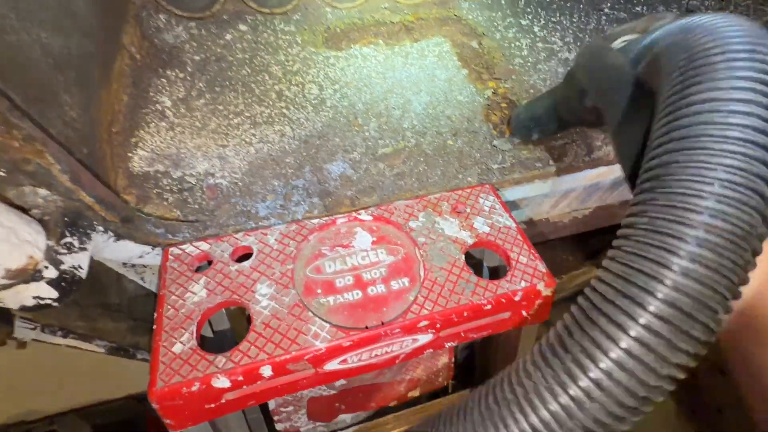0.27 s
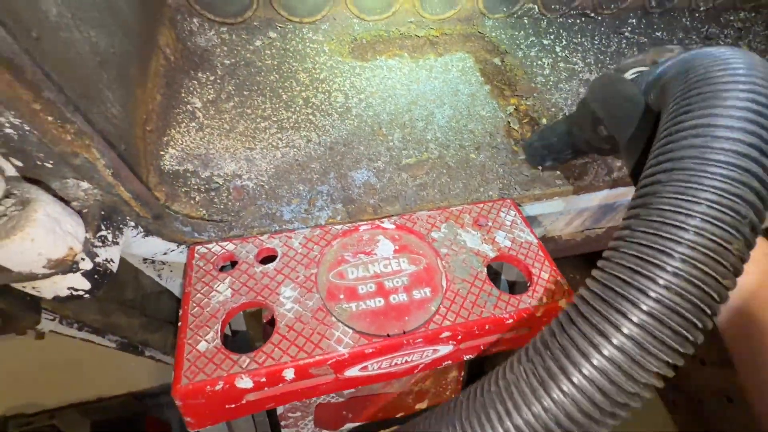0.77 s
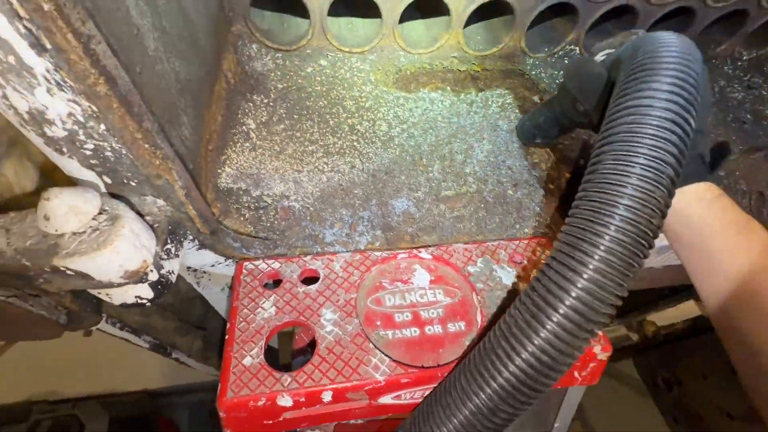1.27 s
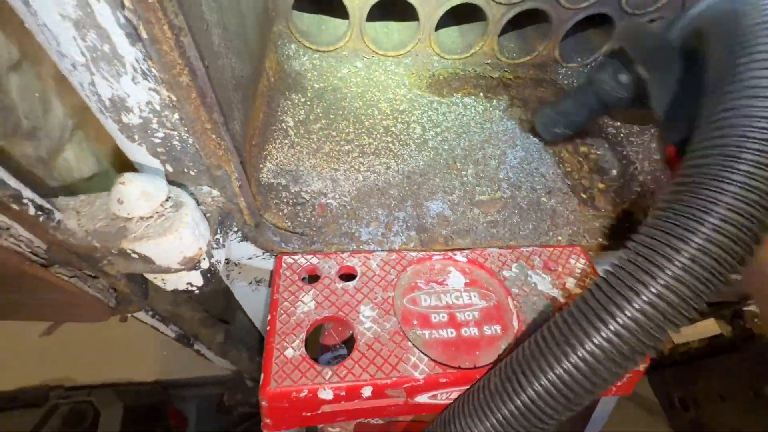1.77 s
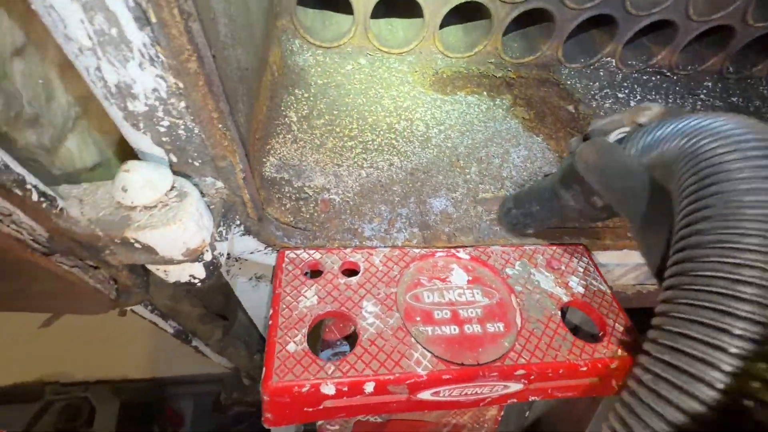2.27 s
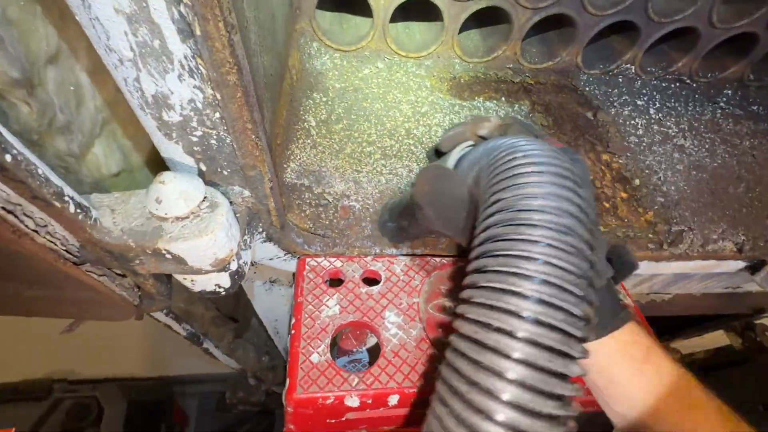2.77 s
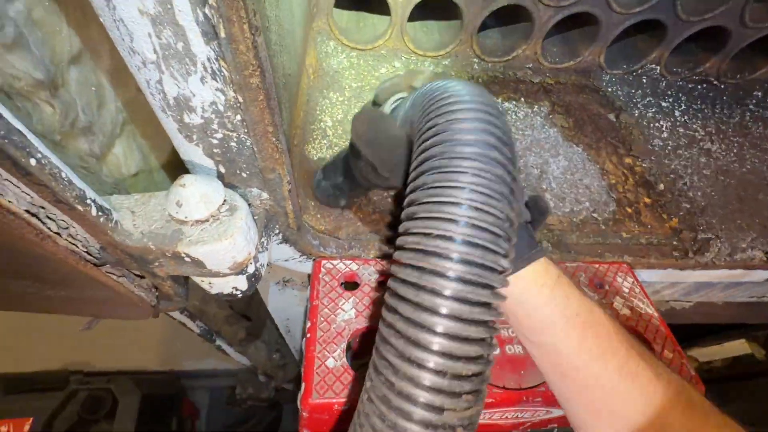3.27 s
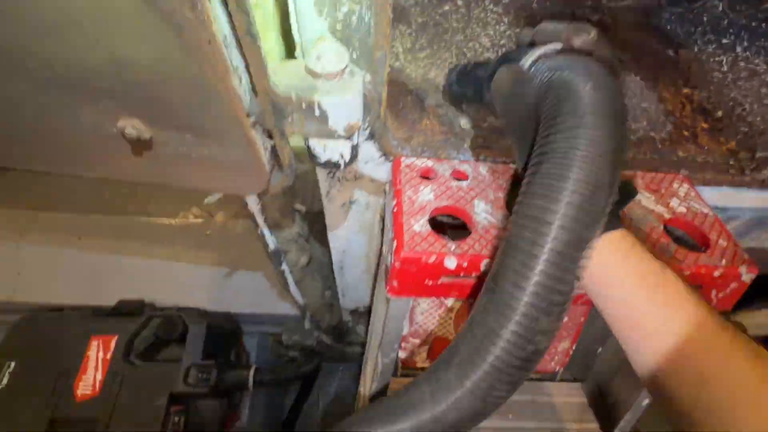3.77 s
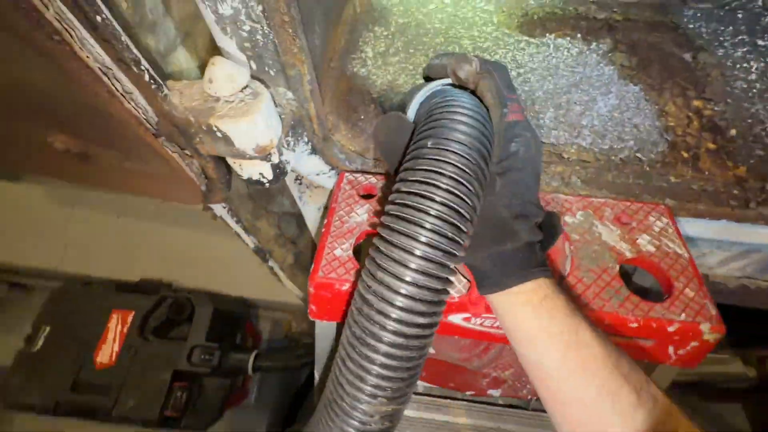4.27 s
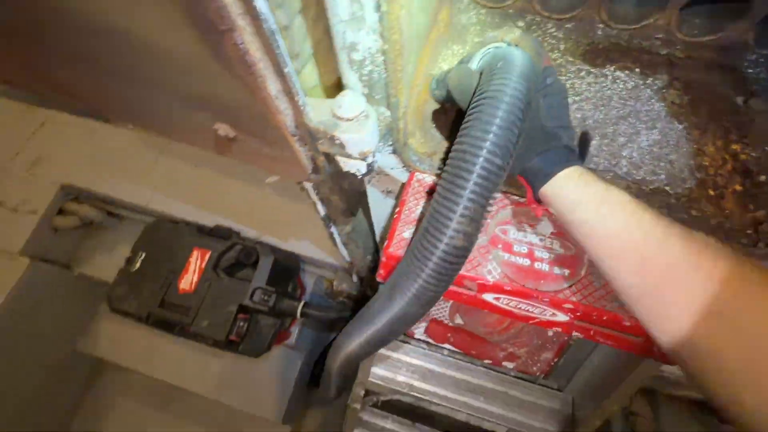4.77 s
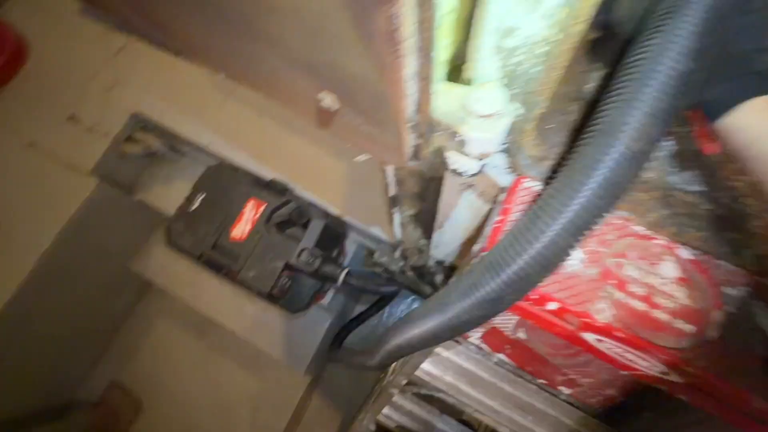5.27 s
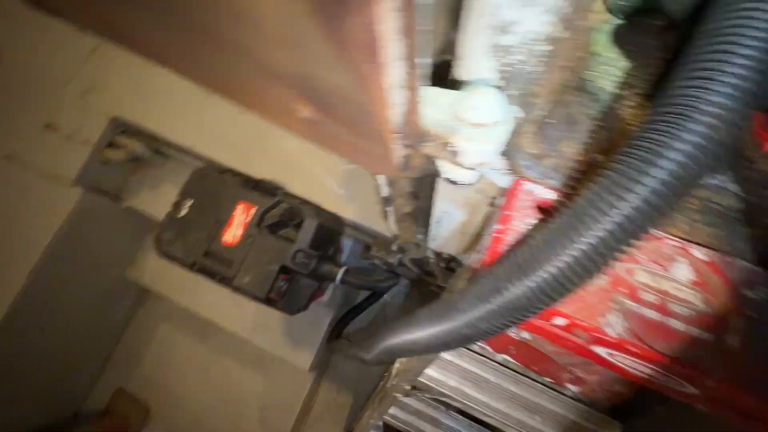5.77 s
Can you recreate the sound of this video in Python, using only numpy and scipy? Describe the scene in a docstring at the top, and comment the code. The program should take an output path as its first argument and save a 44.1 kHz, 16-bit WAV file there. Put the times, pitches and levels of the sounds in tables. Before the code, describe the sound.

A vacuum runs throughout without stopping, its tonal whine shifting gently between left and right. Air rushes through a ribbed hose, crackling with fine debris that leans left. Lumps rap the hose early on and again past halfway; breathy high whistling swells as the nozzle gap narrows. The microphone is close and moving, in a hard metal boiler space.

```python
"""Shop vacuum in a boiler room

The motor whines as a sine with faint overtones. Air is patchy noise: hose resonances boom, the rush has its
own spectrum, and nozzle resonances whistle and nearly sing. Grit is ticking noise with sprays and a gliding
squeak; lumps knock the hose wall with decaying sines, resonant blows and thuds of noise.
Two microphones a hand apart move about, so the whine shifts between them."""
import sys
import numpy as np
from scipy import signal
from scipy.fft import rfft, irfft, next_fast_len
from scipy.io import wavfile
from scipy.ndimage import uniform_filter1d, map_coordinates

SR = 44100
rng = np.random.default_rng(int(sys.argv[2]) if len(sys.argv) > 2 else 0)


def file_out(sig):
    """Save sig as 16-bit WAV at sys.argv[1]."""
    # one column per channel
    cols = np.atleast_2d(sig).T
    # limit, then scale
    lim = np.clip(cols, -1, 1)
    pcm = np.round(lim * 32767).astype(np.int16)
    wavfile.write(sys.argv[1], SR, pcm)


def magnitude_from_level(level_db):
    """Linear magnitude for a level in decibels (20 dB per decade)."""
    exponent = np.asarray(level_db, float) / 20
    return 10 ** exponent


N = 265923
TIME = np.arange(N) / SR  # seconds

# Motor whine, which speeds up when the nozzle is choked.
# Each row: time in seconds, pitch in Hz, left level in dB, right level in dB.
WHINE_PATH = [(0.03, 821.5, -38, -41), (0.55, 821.8, -40, -42.5), (1.1, 821, -39, -42.2),
              (1.63, 821.5, -40, -43), (2.07, 818, -41.5, -41.5), (2.25, 822.2, -41.5, -43),
              (2.83, 823.8, -43.5, -43.0), (3.07, 828, -47.5, -43), (3.43, 823.7, -44.5, -44.5),
              (3.58, 826.5, -44.5, -45), (3.83, 820, -42.5, -44), (4.03, 814.4, -43.5, -43.1),
              (4.43, 813.1, -40, -41.5), (4.63, 814.6, -40, -39), (4.97, 814, -42.5, -37.5),
              (5.23, 816.3, -41, -39), (5.43, 818, -47, -40.3), (5.6, 818.4, -46.5, -40.5),
              (6.01, 812.8, -39.5, -41)]
# The level dips briefly at the lowest partial alone.
# Holds: centre in seconds, half width in seconds, level change in dB.
LEVEL_DIP = (3.085, 0.014, -4.5)
# Overtones of the whine at rest, before flutter. Each row: multiple of the pitch, left dB, right dB.
OVERTONES_AT_REST = [(2, -69, -65.5), (3, -66, -70), (4, -74, -70.5), (5, -77, -83), (8, -79, -84),
                     (9, -77, -78), (10, -82, -85)]
# Overtones that swell at the left microphone.
# Each row: multiple of the pitch, centre in seconds, half width in seconds, added amplitude in dB.
LEFT_OVERTONE_SWELLS = [(2, 1.167, 0.16, -63.5), (2, 1.88, 0.303, -65), (2, 2.5, .3, -71),
                        (2, 3.9, 0.51, -66), (2, 5.52, 0.75, -64.5), (3, 2.87, 0.19, -65),
                        (3, 3.79, 0.147, -64), (3, 5.66, 0.31, -69), (5, 0.62, 1.1, -67),
                        (4, 4.03, 0.16, -71), (9, .55, .9, -61.5), (9, 2.7, .33, -70), (9, 4.4, .6, -67.5),
                        (9, 5.65, .25, -67.5), (10, 1.65, 0.17, -71), (10, 3.6, 0.27, -75),
                        (10, 5.8, 0.43, -76)]
# The same at the right microphone.
# Each row: multiple of the pitch, centre in seconds, half width in seconds, added amplitude in dB.
RIGHT_OVERTONE_SWELLS = [(2, 2.01, .15, -63.5), (2, 2.94, 0.62, -68.5)]
# Overtones cancelled or turned over in phase at the right microphone.
# Each row: multiple of the pitch, centre in seconds, half width in seconds, subtracted amplitude in dB.
RIGHT_TURNOVERS = [(2, 4.4, 0.3, -62.5), (2, 5.56, 0.24, -58), (3, 5.61, 0.36, -62)]
FREE_HZ = 814
LEAD_RAD, LEAD_RAD_PER_HZ = 0.29, 0.11  # left leads more as the pitch climbs over FREE_HZ

# Standing waves of the hose air. Each row: centre in Hz, width in Hz, relative level in dB.
HOSE_MODES = [(116.6, 23.6, -2.5), (179.5, 12.4, 1), (237, 12.4, 2.5), (290.4, 10.6, -1), (328, 16, 4.5),
              (393.8, 11.7, 1), (449, 11, 2.5), (518, 41, -6), (653, 34, -1), (1102, 196, -6)]
# Resonances of the nozzle gap, applied twice. Each row: centre in Hz, width in Hz, level per pass in dB.
NOZZLE_MODES = [(3080, 106, 4.5), (3253, 180, 7.5), (3540, 850, 4)]
# Colour of the rush of air. Each row: frequency in Hz, relative density in dB per Hz.
RUSH_SPECTRUM = [(80, -24), (200, 0.5), (800, 2), (1050, -1.5), (1450, -0.5), (2200, 2.5), (2800, -0.5),
                 (4000, -2), (5800, -5), (7400, -5), (9000, -18.5), (16000, -34.5)]
# Colour of the grit stream. Each row: frequency in Hz, relative density in dB per Hz.
HISS_SPECTRUM = [(1000, -22), (3000, -6.5), (6000, -11.5), (10000, -4.5), (13000, -12), (14500, -9.5),
                 (16000, -14.5)]

# Left-right likeness once the arrival lag is taken out. Each row: frequency in Hz, likeness from 0 to 1.
LIKENESS = [(60, 1), (450, 0.85), (1120, 0), (1430, 0.68), (2000, 0), (3400, 0.28), (15000, 0.06)]
# Long waves fill the room and do not keep that lag. Each row: frequency in Hz, left lead in radians.
LONG_WAVE_LEAD = [(400, 0), (1000, .4), (1250, 3), (1900, 3)]
LAG_S = 0.00024  # sound from the nozzle reaches the left microphone first

# How much grit streams up the hose, and where the nozzle is.
# Each row: time in seconds, hiss level in dB, left over right in dB.
GRIT_STREAM = [(0.03, -53.5, 1.5), (.4, -54.5, 3), (.85, -51, 0.5), (1.3, -54, 3.5), (1.75, -60, 2.5),
               (1.97, -65, 9), (2.03, -54.5, 2.5), (2.5, -54.5, 3), (3.3, -58.5, 6.5), (3.6, -63.5, 7.5),
               (4.25, -65, 9.5), (4.4, -59.5, 5), (4.75, -60.5, 4), (5.4, -58.5, 2), (6.0, -58, 2)]
FULL_STREAM_DB = -57
LONG_WAVES_DB, SHORT_WAVES_DB, RUSH_DB = -69.5, -64.5, -56.5  # base levels at FULL_STREAM_DB
HOSE_FOLLOWS, RUSH_FOLLOWS = 0.17, 0.072  # dB for each dB of stream
HOSE_RECEDES_DB_PER_S = 1.2  # the hose is carried away from the microphones
# The hose drags and rumbles.
# Each row: start in seconds, length in seconds, added long waves in dB, added short waves in dB.
HOSE_DRAGS = [(0.24, 0.277, -80, -67.5), (0.773, 0.15, -73.5, -68), (0.98, 0.29, -65, -67),
              (1.971, 0.15, -66, -75), (2.416, 0.076, -63, -92), (3.4, 0.077, -66, -81),
              (3.836, 0.2, -98, -66), (4.149, 0.127, -72, -60), (4.326, 0.186, -78, -75)]
# The nozzle scrapes the floor and the rush swells.
# Each row: start in seconds, length in seconds, added amplitude in dB.
FLOOR_SCRAPES = [(0.728, 0.2, -64.5), (3.396, 0.089, -63), (4.338, 0.409, -63)]
# The nozzle gap narrows and whistles.
# Each row: start in seconds, length in seconds, added dB at the start, added dB at the end.
GAP_WHISTLES = [(0.537, 0.16, -57, -69), (1.17, 0.58, -66, -62.5), (2.123, 0.6, -59, -57),
                (2.742, 0.86, -54, -60.5), (4.956, 0.397, -62, -66.5), (5.367, 0.9, -63, -71)]
OPEN_WHISTLE_DB, EDGE_S = -77, 0.022  # whistle of the open gap; rise and fall of every spell

PUFFS_PER_S, PUFF_FADE_S, PUFF_DB = 14, 0.014, 1  # grit comes in puffs that start sharply
# A crumb squeaks through the gap.
# Holds: centre in seconds, half length in seconds, peak in dB, pitch at the centre in Hz, rise in Hz per second.
CRUMB_SQUEAK = (0.1, .012, -52, 2100, 5001.5)
# Sprays of grit at the nozzle.
# Each row: start in seconds, level in dB before the envelope, fade length in seconds, centre in Hz.
GRIT_SPRAYS = [(0.238, -54.5, 0.099, 9000), (0.46, -53, 0.035, 10100), (0.805, -52, 0.032, 8000),
               (1.651, -53.5, 0.044, 4470), (2.459, -58, 0.056, 11000), (3.482, -56, 0.097, 1930),
               (3.705, -59, 0.0416, 9970), (4.89, -44.5, 0.044, 7460)]
# Lumps knocking the hose. Each row: time in seconds, strength in dB before shaping, pitch in Hz.
LUMP_KNOCKS = [(0.261, -32, 452), (.268, -31.5, 650), (.271, -36.5, 310), (0.313, -43, 260),
               (2.42, -50, 208), (3.408, -46, 560), (3.411, -39.5, 174), (3.419, -45, 100),
               (3.434, -49, 330), (3.827, -34.5, 418), (4.191, -42, 505), (4.38, -41.5, 301)]
# The struck wall answers broad and dull, applied twice. Each row: centre in Hz, width in Hz, dB per pass.
WALL_MODES = [(380, 620, 8.5)]
# Narrow piping inside the whistle. Each row: start in seconds, length in seconds, level in dB, pitch in Hz.
PIPING_NOTES = [(1.168, 0.45, -63.5, 3390), (5.372, 0.344, -64, 3344)]
PIPING_WIDTH_HZ = 26


def unit(x):
    """Scale to rms 1."""
    return x / np.sqrt(np.mean(x ** 2) + 1e-20)


def along(points, hz):
    """Read (Hz, value) points on a log frequency axis."""
    f, v = np.transpose(points)
    return np.interp(np.log(hz + 1), np.log(f + 1), v)


def curves(rows):
    """One value per sample for each column after the time."""
    s, *columns = np.transpose(rows)
    return [np.interp(TIME, s, column) for column in columns]


def wobble(rate):
    """A smooth random curve, rate knots a second."""
    return map_coordinates(rng.standard_normal(N // 100), [np.arange(N) * rate / SR])


def bump(centre, half_width):
    """A bell-shaped swell of height 1."""
    return np.exp(-((TIME - centre) / half_width) ** 2)


def spell(start, length, db, end_db):
    """A gain that rises at start, slides from db to end_db and falls away after length."""
    t = TIME - start
    gate = np.clip(np.minimum(t, length - t) / EDGE_S + 0.5, 0, 1)
    return gate * magnitude_from_level(db + (end_db - db) * np.clip(t / length, 0, 1))


def filtered(x, response):
    """x times a complex response of frequency."""
    m = next_fast_len(N + 8192)
    spectrum = rfft(x, m) * response(np.fft.rfftfreq(m, 1 / SR))
    return irfft(spectrum, m)[..., :N]


def modes(table):
    """Causal response of a set of resonances, alternating in sign."""
    def response(f):
        total = 0
        for k, (centre, width, db) in enumerate(table):
            damping = 1j * f * width
            total = total + (-1) ** k * magnitude_from_level(db) * damping / (centre ** 2 - f ** 2 + damping)
        return total
    return response


def patchy(patchy_db):
    """Two noises that share patches of random gain over time and frequency."""
    z = signal.stft(rng.standard_normal((2, N)), nperseg=512)[2]
    field = uniform_filter1d(rng.standard_normal(z.shape[1:]), size=6, axis=0)
    field = uniform_filter1d(field, size=12, axis=1)
    return signal.istft(z * magnitude_from_level(patchy_db * unit(field)), nperseg=512)[1][:, :N]


def heard(pair, pan_db):
    """A direct and a diffuse part reach both microphones, late at the right; pan_db is left over right."""
    def blend(hz):
        angle = np.arccos(np.clip(along(LIKENESS, hz), 0, 1)) / 2
        return np.array([np.cos(angle), np.sin(angle)])

    def arrival(hz):
        in_room = hz < LONG_WAVE_LEAD[-1][0]
        return np.exp(-1j * np.where(in_room, along(LONG_WAVE_LEAD, hz), 2 * np.pi * hz * LAG_S))

    direct, diffuse = filtered(pair, blend)
    right = filtered(direct - diffuse, arrival)
    return np.array([direct + diffuse, right]) * magnitude_from_level(np.array([[0.5], [-0.5]]) * pan_db)


def stream_load_db():
    """How far the grit stream stands over its full level, in dB."""
    return curves(GRIT_STREAM)[0] - FULL_STREAM_DB


def whine():
    """A wavering sine and its overtones; room echoes make each overtone swell and fade on its own."""
    hz, left_db, right_db = curves(WHINE_PATH)
    phase = 2 * np.pi * np.cumsum(hz + 0.663 * wobble(25)) / SR

    def tone(k, gain, lead):
        return np.sqrt(2) * gain * np.sin(k * phase + np.array([lead, -lead]) / 2)

    gain = magnitude_from_level([left_db + 0.074 * wobble(30), right_db + 0.17 * wobble(34)])
    sound = tone(1, gain, LEAD_RAD + LEAD_RAD_PER_HZ * (hz - FREE_HZ))
    centre, half_width, change_db = LEVEL_DIP
    sound = sound * magnitude_from_level(change_db * bump(centre, half_width))

    gains = {k: magnitude_from_level([[left], [right]]) * np.ones(N) for k, left, right in OVERTONES_AT_REST}
    for side, swells in enumerate([LEFT_OVERTONE_SWELLS, RIGHT_OVERTONE_SWELLS]):
        for k, s, width, db in swells:
            gains[round(k)][side] += magnitude_from_level(db) * bump(s, width)
    for k, s, width, db in RIGHT_TURNOVERS:
        gains[round(k)][1] -= magnitude_from_level(db) * bump(s, width)  # a gain below zero flips the phase
    for k, gain in gains.items():
        flutter = magnitude_from_level(1.8 * np.array([wobble(17), wobble(21)]))
        sound = sound + tone(k, gain * flutter, 2 * np.pi * k * hz * LAG_S)
    return sound


def hose_boom():
    """Turbulence rings the standing waves of the hose, long and short ones apart."""
    follow_db = HOSE_FOLLOWS * stream_load_db()
    long_gain, short_gain = magnitude_from_level(LONG_WAVES_DB + follow_db), magnitude_from_level(SHORT_WAVES_DB + follow_db)
    for s, length, long_db, short_db in HOSE_DRAGS:
        long_gain = long_gain + spell(s, length, long_db, long_db)
        short_gain = short_gain + spell(s, length, short_db, short_db)
    long_waves = unit(filtered(patchy(1.5), modes(HOSE_MODES[:3]))) * long_gain * magnitude_from_level(1.5 * wobble(18))
    short_waves = unit(filtered(patchy(1.5), modes(HOSE_MODES[3:]))) * short_gain * magnitude_from_level(1.3 * wobble(18))
    receding = magnitude_from_level(-HOSE_RECEDES_DB_PER_S * (np.arange(N) - N / 2) / SR)
    return heard((long_waves + short_waves) * receding, pan_db=-1.1)


def air_rush():
    """Broad turbulence rushes through the motor and swells as the nozzle scrapes the floor."""
    flow = magnitude_from_level(RUSH_DB + RUSH_FOLLOWS * stream_load_db())
    for s, length, db in FLOOR_SCRAPES:
        flow = flow + spell(s, length, db, db)
    rush = unit(filtered(patchy(2.1), lambda hz: magnitude_from_level(along(RUSH_SPECTRUM, hz))))
    return heard(rush * flow * magnitude_from_level(0.14 * wobble(8.6)), pan_db=2.5)


def nozzle_whistle():
    """Turbulence whistles in the nozzle gap, louder when the gap narrows."""
    narrow = magnitude_from_level(OPEN_WHISTLE_DB) + sum(spell(*row) for row in GAP_WHISTLES)
    gap = modes(NOZZLE_MODES)
    whistle = unit(filtered(patchy(0.6), lambda hz: gap(hz) ** 2))
    return heard(whistle * narrow * magnitude_from_level(0.9 * wobble(40)), pan_db=5.5)


def grit_stream():
    """Fine grit hisses and ticks along the ribs, in puffs that start sharply and fade."""
    hiss_db, pan_db = curves(GRIT_STREAM)
    struck = rng.random(N) < 0.02  # chance of a tick at each sample
    tick_db = np.minimum(2.0 * rng.exponential(size=N), 12)
    ticks = rng.standard_normal((2, N)) * struck * magnitude_from_level(tick_db)
    grains = patchy(0.64) + 0.6 * unit(ticks)
    stream = unit(filtered(grains, lambda hz: magnitude_from_level(along(HISS_SPECTRUM, hz))))
    starts = (rng.random(N) < PUFFS_PER_S / SR) * rng.random(N)
    puffs = unit(signal.lfilter([1], [1, -np.exp(-1 / (PUFF_FADE_S * SR))], starts))
    return heard(stream * magnitude_from_level(hiss_db + PUFF_DB * (puffs - puffs.mean())), pan_db)


def crumb_squeak():
    """A crumb in the gap gives a short sine of rising pitch, alike at both microphones."""
    s, half, db, hz, rise = CRUMB_SQUEAK
    t = TIME - s
    return magnitude_from_level(db) * np.exp(-(t / half) ** 4) * np.sin(2 * np.pi * (hz + rise * t / 2) * t)


def grit_sprays():
    """Dense bursts of grains with a sharp start, duller for coarser grit."""
    sound = np.zeros((2, N))
    for s, db, length, hz in GRIT_SPRAYS:
        grains = magnitude_from_level(2.2 * wobble(300)) * rng.standard_normal((2, N))
        body = modes([(hz, 1.4 * hz, 0)])
        rattle = unit(filtered(grains, lambda f: body(f) / (1 + (f / 13500) ** 8)))
        t = TIME - s
        envelope = np.clip(t / 0.003 + 0.5, 0, 1) * np.exp(-np.abs(t / length) ** 3)
        sound = sound + rattle * magnitude_from_level(db) * envelope
    return heard(sound, curves(GRIT_STREAM)[1])


def knocks():
    """Each lump gives a dull blow, a short ring around its own pitch and a thud that rings the hose air."""
    ring, thud, blows = np.zeros(N + SR), np.zeros(N + SR), np.zeros(N)
    t = np.arange(SR // 4) / SR
    for s, db, hz in LUMP_KNOCKS:
        here = slice(round(s * SR), round(s * SR) + len(t))
        ring_gain = magnitude_from_level(db - 60 * t / 0.06) * (1 - np.exp(-t / 0.001))
        ring[here] += ring_gain * np.sin(2 * np.pi * hz * t)
        thud_gain = magnitude_from_level(db + 11 - 60 * t / 0.025) * (1 - np.exp(-t / 0.002))
        thud[here] += thud_gain * rng.standard_normal(len(t))
        blows[round((s + 0.002) * SR)] = -magnitude_from_level(db)
    wall = modes(WALL_MODES)
    sound = 0.5 * ring[:N] + filtered(thud[:N], modes(HOSE_MODES[2:-1]))
    sound = sound + filtered(blows, lambda hz: wall(hz) ** 2)
    return np.array([sound, sound])


def piping():
    """Now and then the nozzle gap nearly sings: noise through one narrow resonance."""
    sound = np.zeros((2, N))
    for s, length, db, hz in PIPING_NOTES:
        note = unit(filtered(patchy(0.99), modes([(hz, PIPING_WIDTH_HZ, 0)])))
        sound = sound + note * spell(s, length, db, db)
    return heard(sound, pan_db=8.0)


def scene():
    """Everything the two microphones pick up."""
    air = hose_boom() + air_rush() + nozzle_whistle()
    grit = grit_stream() + crumb_squeak() + grit_sprays()
    return whine() + air + grit + knocks() + piping()


def band_limit(x):
    """A steep low-pass at the top of the band."""
    return signal.sosfilt(signal.butter(12, 16070, fs=SR, output="sos"), x)


def record(dry):
    """The microphones drop the deep bass and the very top."""
    def band(hz):
        return (1j * hz / (75 + 1j * hz)) ** 2 * (hz < 15830)

    mix = filtered(dry, band)
    return band_limit(mix)


dry = scene()
out = record(dry)
file_out(out)
```